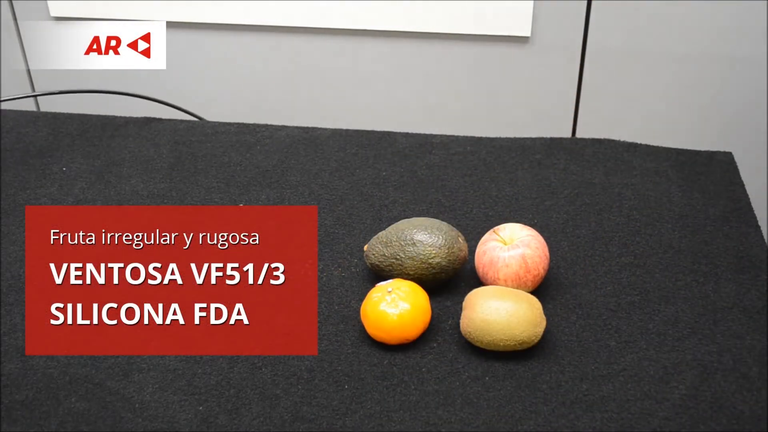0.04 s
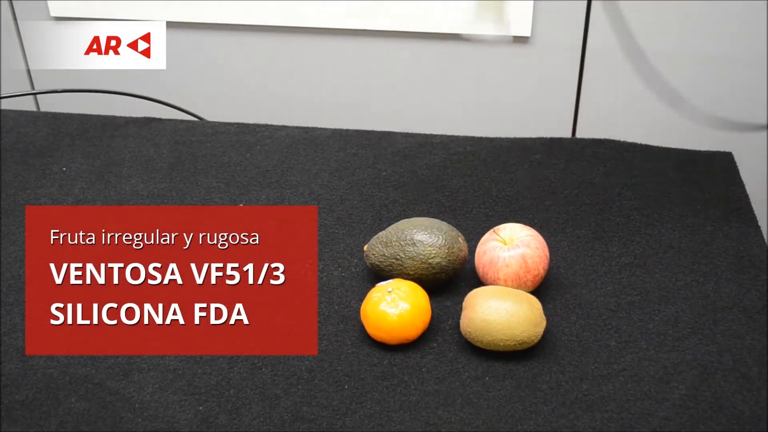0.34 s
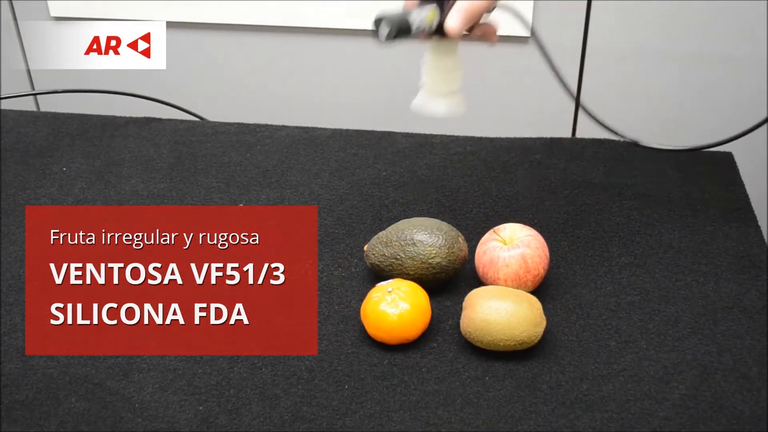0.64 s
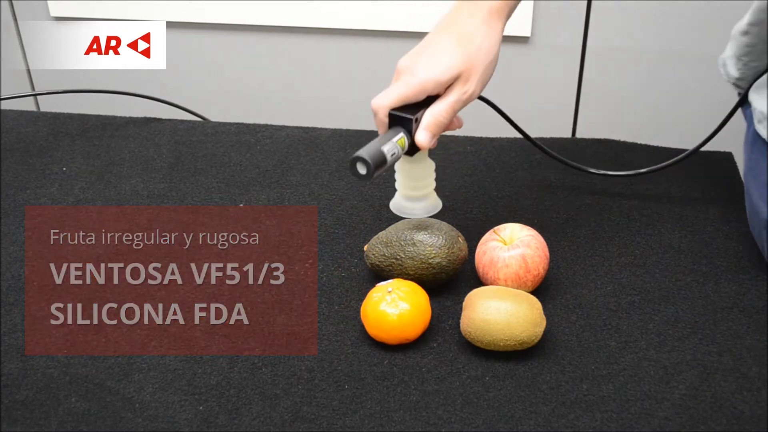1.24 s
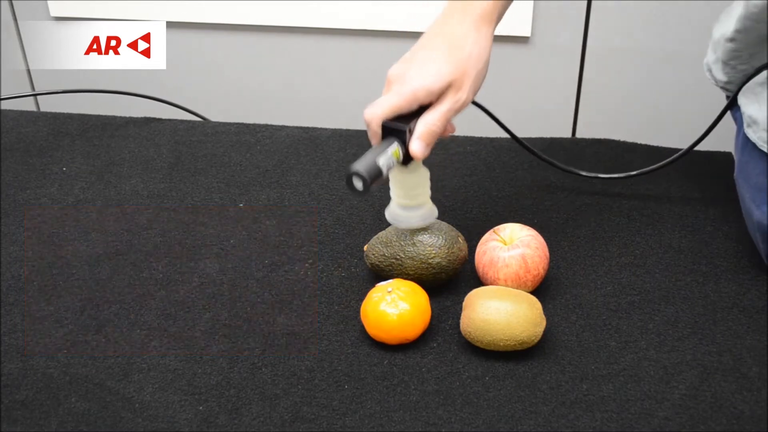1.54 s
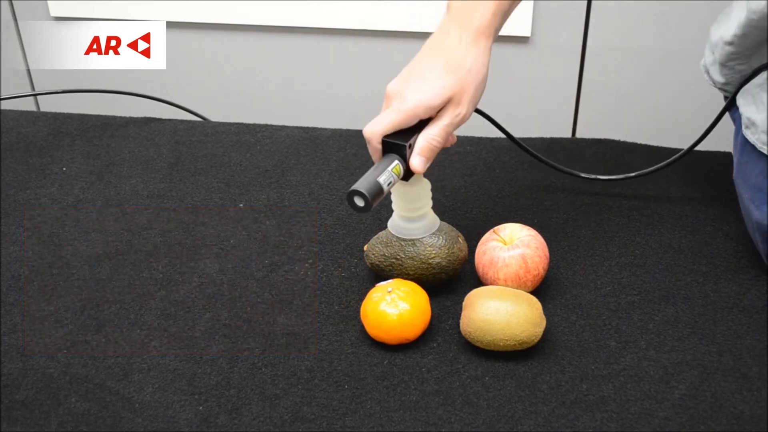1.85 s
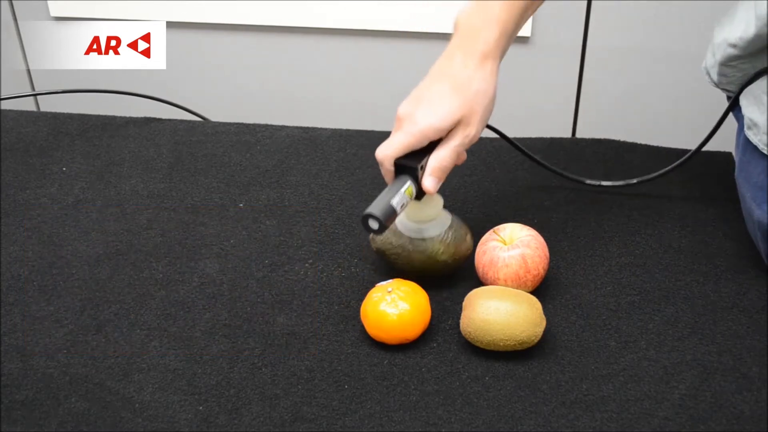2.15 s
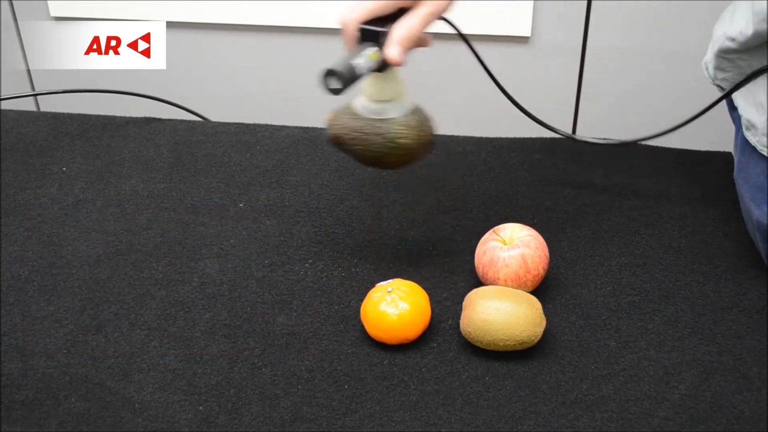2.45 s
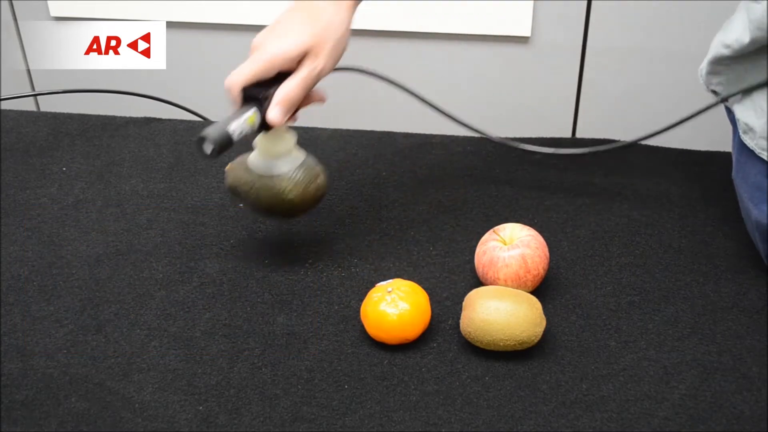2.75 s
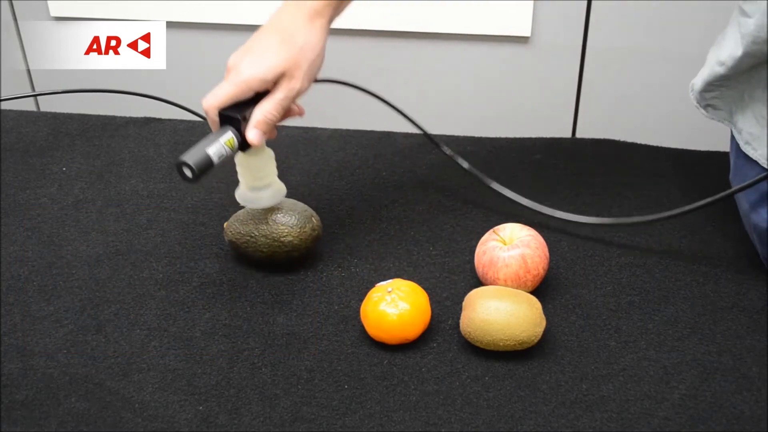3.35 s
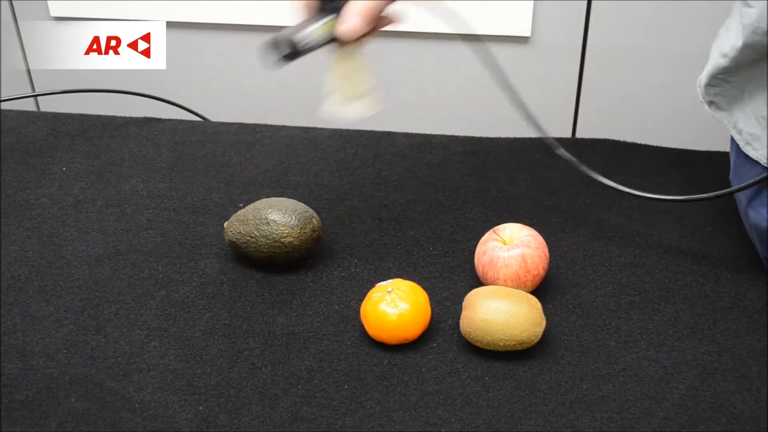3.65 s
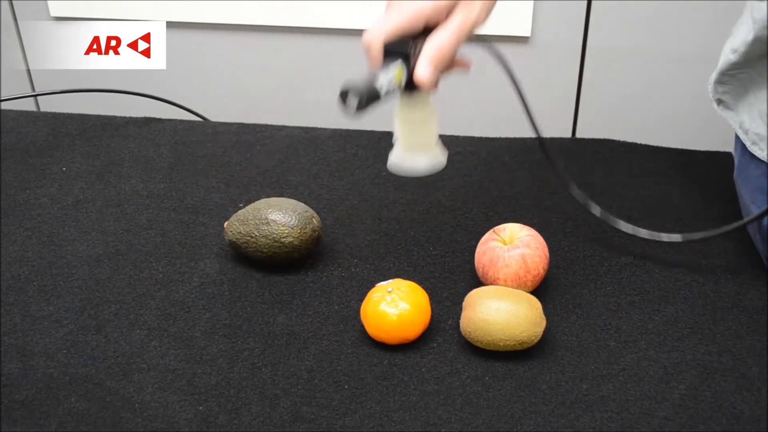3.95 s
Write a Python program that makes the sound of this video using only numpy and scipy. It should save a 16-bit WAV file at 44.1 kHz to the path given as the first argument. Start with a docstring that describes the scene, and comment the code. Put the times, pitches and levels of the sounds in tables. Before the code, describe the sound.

Close up in a small room, a hand-held suction tool gives a sweeping, airy hiss. It sinks as the cup grips a fruit, cuts off with a very faint thud, then spits and comes back loud.

```python
"""A cloth-covered table in a small room, heard close up in mono. A hand-held vacuum ejector hisses with
turbulent exhaust air, faint whistles coming and going as its silicone cup is lowered onto an avocado. The hiss
sinks when the cup seals, and soon after the level dips briefly; the hiss stops as the fruit is set down with a
soft thud, and returns with a spit as the cup lifts away. A reflection off the table top sweeps through the hiss
as the tool moves. Room tone and a low hum lie underneath."""
import sys
import numpy as np
from scipy import signal
from scipy.fft import rfft, irfft
from scipy.io import wavfile
from scipy.ndimage import uniform_filter1d, map_coordinates

SR = 44100
rng = np.random.default_rng(int(sys.argv[2]) if len(sys.argv) > 2 else 0)


def output_pcm(signal):
    """Save a mono or channel-first signal as 16-bit PCM at the path in sys.argv[1].

    Samples are clipped to [-1, 1] before scaling.
    """
    pcm = np.clip(np.atleast_2d(signal).T, -1, 1) * 32767
    wavfile.write(sys.argv[1], SR, np.round(pcm).astype(np.int16))


N = 176400
TIME = np.arange(N) / SR
HZ = np.fft.rfftfreq(N, 1 / SR)

# Colour of the air in each state of the cup. Each row: frequency in Hz, relative level in dB.
DESCENDING_COLOUR = [(60, -41.5), (200, -27.5), (254, -20.5), (286, -29.5), (335, -12), (385, -15),
                     (461, -10), (510, -1), (572, 1.5), (635, -5), (830, 1), (900, -5), (950, 1.5),
                     (1109, -5), (1201, 0.5), (1466, -3.5), (1526, -2), (1938, -4.5), (2017, -2),
                     (2185, -5), (3005, -4.5), (4134, -11.5), (6158, -14), (6940, -15), (8470, -15),
                     (11651, -15.5), (15400, -24.5)]
SEALED_COLOUR = [(60, -30), (200, -25), (400, -19), (490, -6.5), (570, 2.5), (660, -1.5), (820, 0),
                 (1070, -8), (1200, -4.5), (2270, -13), (2750, -12), (4400, -20), (5700, -18.5),
                 (9900, -25.5), (13000, -36), (15400, -36)]
CARRYING_COLOUR = [(60, -48), (200, -30), (310, -32.5), (440, -24.5), (610, -16.5), (700, -11), (790, -3),
                   (930, -8), (1130, 1.5), (1300, -8.5), (1440, -2), (1530, -7), (1640, -5), (1760, -5),
                   (1950, -5.5), (2460, -10.5), (4130, -13.5), (5700, -19), (6400, -20.5), (8800, -18),
                   (10800, -23), (13100, -22.5), (15400, -25)]
RIM_LEAK_COLOUR = [(2000, -32), (6000, -12), (10000, -3), (13000, -6), (15500, -4)]
SHUTTING_COLOUR = [(200, -33), (440, -17), (660, -23), (775, 3.5), (940, -14), (1110, 2), (1400, -12),
                   (2100, -14), (2620, -3), (3000, -18), (4100, -18.5), (6200, -26.5), (15400, -28)]
SPIT_COLOUR = [(200, -33), (800, -10), (1600, -9.5), (2300, -1), (2900, 1.5), (3500, -34), (8000, -13),
               (15000, -28)]
RISING_COLOUR = [(60, -45), (200, -37), (280, -26.5), (380, -23), (450, -25.5), (640, -8), (720, -8),
                 (820, -4), (1050, 0), (1230, 0), (1580, -3.5), (1940, -1.5), (3250, -5), (4400, -4),
                 (6900, -13), (8800, -12), (10800, -15.5), (13100, -12.5), (15400, -14.5)]
# Strength of the air flow in those states. Each row: time in seconds, level in dB.
DESCENDING_FLOW = [(0, -39.5), (.33, -38.5), (.65, -38.5), (1, -39), (1.5, -40), (1.915, -39),
                   (1.955, -47.5), (1.985, -64), (2.03, -74)]
SEALED_FLOW = [(1.922, -46), (1.97, -48), (2.05, -52), (2.176, -51.5)]
CARRYING_FLOW = [(2.182, -51.5), (2.3, -52), (2.45, -51.5), (3.0, -50), (3.13, -52), (3.18, -62.5),
                 (3.22, -75)]
RIM_LEAK_FLOW = [(3.1, -76), (3.16, -57), (3.21, -69), (3.245, -72)]
SHUTTING_FLOW = [(3.14, -57), (3.17, -68), (3.205, -63), (3.227, -47.5), (3.244, -66), (3.27, -75)]
SPIT_FLOW = [(3.502, -83), (3.518, -49.5), (3.53, -49), (3.56, -61), (3.6, -70)]
RISING_FLOW = [(3.511, -79), (3.535, -47), (3.553, -38.5), (3.75, -38), (4, -38)]
# A hollow resonance rises as the tool comes down, a band of hiss as the gap to the fruit closes.
# Each row: time in seconds, pitch in Hz.
HOLLOW_PITCH = [(0, 715), (.3, 796), (.6, 879.6), (1, 968)]
GAP_PITCH = [(.9, 3074), (1.45, 3300), (1.62, 3623), (1.95, 3786)]
# Narrow air resonances of the open cup near the fruit.
# Each row: pitch in Hz, width in Hz, relative level in dB.
AIR_MODES = [(1221, 22, -6), (1438, 25, -2.5), (2810, 26, -17), (3024, 64, -10)]
# Strength of these three kinds of resonance. Each row: time in seconds, level in dB.
HOLLOW_LEVEL = [(0, -50), (.15, -49), (.35, -46.5), (.6, -57), (.85, -68), (1.1, -87)]
GAP_LEVEL = [(.9, -57), (1.45, -60), (1.62, -51), (1.91, -62), (1.98, -72)]
AIR_MODES_LEVEL = [(0, -59), (.7, -62), (1.2, -52), (1.9, -48), (1.98, -77)]
# Treble of the hiss while the tool is far overhead. Each row: time in seconds, gain in dB.
TREBLE_SHADE = [(0, -8), (.15, -7.5), (.4, -1.5)]
# Reflections off hand and table. Each row: time in seconds, lag behind the direct sound in ms.
HAND_LAG = [(0, .38), (.7, .335), (1.4, .345), (2.17, .33), (2.19, .235)]
TABLE_LAG = [(0, 1.44), (.1, 1.35), (.3, 1.24), (.45, 1.185), (.6, 1.086), (.8, .89), (1, .79),
             (1.19, .668), (1.27, .664), (1.34, .7), (1.41, .7), (1.52, .658), (1.66, .568), (1.8, .584),
             (1.91, .562), (2, .49), (2.09, .46), (2.165, .485), (2.19, .32), (2.24, .35), (2.29, .41),
             (2.39, .605), (2.48, .642), (2.62, .595), (2.74, .462), (2.82, .431), (3, .428), (3.06, .39),
             (3.14, .33), (3.24, .35), (3.5, .47), (3.55, .495), (3.6, .572), (3.66, .675), (3.75, .772),
             (3.81, .786), (3.9, .736), (4, .665)]
# Their strength. Each row: time in seconds, level against the direct sound in dB.
HAND_LEVEL = [(0, -35), (.9, -20), (1.4, -22), (1.9, -20), (2.5, -17), (3.2, -16), (3.6, -38)]
TABLE_LEVEL = [(0, -15), (.6, -11.5), (1.2, -7), (1.8, -6.5), (2.3, -9.5), (2.6, -9), (2.85, -5.5),
               (3.15, -10), (3.6, -7), (4, -10)]
# Decay of the room. Each row: frequency in Hz, seconds to fall by 60 dB.
ROOM_T60 = [(200, 0.19), (1000, 0.28), (4000, 0.24), (14000, 0.12)]
# Colour of the room tone. Each row: frequency in Hz, relative level in dB.
ROOM_TONE = [(25, -5.5), (70, -7.5), (130, -8), (260, 0.5), (370, -4), (700, -1.5), (1300, -3), (2300, -9),
             (4000, -22), (7000, -32), (15000, -40)]
# Faint wavering hums. Each row: start and end in seconds, pitch and width in Hz, level in dB.
HUMS = [(0, 2.18, 151.4, 14, -75.5), (2.18, 4, 226.2, 16, -76.5)]
# Air whistles on the way down. Each row: start and end in seconds, pitch and waver in Hz, level in dB.
WHISTLES = [(.22, .88, 834, 11, -49), (.645, .99, 2038, 14, -48.5), (1.62, 1.93, 712, 35, -56),
            (1.68, 1.96, 2039, 14, -57)]


def amp(db):
    """Decibels to gain."""
    return 10 ** (np.asarray(db) / 20)


def unit(x):
    """Scales to rms 1."""
    return x / np.sqrt(np.mean(x ** 2) + 1e-20)


def curve(points):
    """Joins timed points with straight lines."""
    return np.interp(TIME, *np.transpose(points))


def spectrum(points, hz):
    """Joins points on a log-frequency axis."""
    f, value = np.transpose(points)
    return np.interp(np.log(hz + 1), np.log(f), value)


def envelope(points):
    """Gain from a level curve: silent outside it, but held where it runs to an end of the scene."""
    seconds, db = np.transpose(points)
    before = db[0] if seconds[0] < .1 else -150
    after = db[-1] if seconds[-1] > TIME[-1] - .1 else -150
    return amp(np.interp(TIME, seconds, db, left=before, right=after))


def lowpass(corner_hz, order):
    """Gain per frequency, falling to a half at the corner."""
    return 1 / (1 + (HZ / corner_hz) ** order)


def noise(gain):
    """Noise of rms 1 with the given gain per frequency."""
    return unit(irfft(rfft(rng.standard_normal(N)) * gain, N))


def delayed(x, lag_ms):
    """The sound arriving later by a moving lag."""
    return map_coordinates(x, [np.arange(N) - lag_ms * SR / 1000], order=5)


def resonance(hz, width_hz):
    """Noise of rms 1 ringing in one resonance, steady or gliding."""
    band = signal.hilbert(noise(1 / (1 + ((HZ - SR / 4) / width_hz * 2) ** 2)))
    turns = np.cumsum(hz * np.ones(N)) / SR - np.arange(N) / 4  # shifts the band from SR / 4 to hz
    return unit((band * np.exp(2j * np.pi * turns)).real)


def ejector(flutter_db=.45, flutter_hz=44.2):
    """Exhaust air, coloured by the state of the cup and fluttering with the turbulence of the jet."""
    states = [(DESCENDING_COLOUR, DESCENDING_FLOW), (SEALED_COLOUR, SEALED_FLOW),
              (CARRYING_COLOUR, CARRYING_FLOW), (RIM_LEAK_COLOUR, RIM_LEAK_FLOW),
              (SHUTTING_COLOUR, SHUTTING_FLOW), (SPIT_COLOUR, SPIT_FLOW), (RISING_COLOUR, RISING_FLOW)]
    air = sum(noise(amp(spectrum(colour, HZ))) * envelope(flow) for colour, flow in states)
    air += resonance(curve(HOLLOW_PITCH), width_hz=210) * envelope(HOLLOW_LEVEL)
    air += resonance(curve(GAP_PITCH), width_hz=320) * envelope(GAP_LEVEL)
    modes = sum(resonance(hz, width) * amp(db) for hz, width, db in AIR_MODES)
    air += modes * envelope(AIR_MODES_LEVEL)
    return air * amp(flutter_db * noise(lowpass(flutter_hz, 2)))


def overhead_shade(x, corner_hz=11000):
    """The hiss reaches the microphone duller while the tool is far overhead."""
    treble = irfft(rfft(x) * (1 - lowpass(corner_hz, 8)), N)
    return x + treble * (amp(curve(TREBLE_SHADE)) - 1)


def table_lag_ms():
    """The smoothed lag of the table's reflection, which stands for the tool's height."""
    return uniform_filter1d(curve(TABLE_LAG), size=1700)


def hand_reflection(x):
    """The jet plus its very short reflection off the hand: a sliding comb."""
    strength = amp(curve(HAND_LEVEL))
    return (x + strength * delayed(x, curve(HAND_LAG))) / np.sqrt(1 + strength ** 2)


def table_reflection(x, dull_hz=18000, trailing_ms=.15, trailing_db=-17):
    """The jet plus two close bounces off the table, weaker when held high: a sweeping comb."""
    lag_ms, strength = table_lag_ms(), amp(curve(TABLE_LEVEL))
    dull = irfft(rfft(x) * np.sqrt(lowpass(dull_hz, 4)), N)
    echo = delayed(dull, lag_ms) + amp(trailing_db) * delayed(dull, lag_ms + trailing_ms)
    return (x + strength * echo) / np.sqrt(1 + strength ** 2)


def clutter(x, count=6, above_hz=2000, level_db=-22):
    """Fruit, arm and hose scatter the treble, each lag drifting its own way with the tool's height."""
    treble = irfft(rfft(x) * (1 - lowpass(above_hz, 2)), N)
    lags_ms = rng.uniform(.7, 2.4, count)
    drifts = rng.uniform(-.45, .5, count)
    echoes = sum(delayed(treble, lag + drift * table_lag_ms()) for lag, drift in zip(lags_ms, drifts))
    return amp(level_db) * echoes


def room(x, step_ms=.22, level_db=-5.5):
    """Short diffuse tails whose treble dies first; each height of the tool excites a different one."""
    lag_ms, wet = table_lag_ms(), np.zeros(N)
    for centre_ms in np.arange(lag_ms.min(), lag_ms.max() + step_ms, step_ms):
        share = np.cos(np.pi / 2 * np.clip((lag_ms - centre_ms) / step_ms, -1, 1))
        hz, age, bands = signal.stft(rng.standard_normal(SR // 2), SR, nperseg=256)
        decay = amp(-60 * age / spectrum(ROOM_T60, hz)[:, None])
        tail = signal.istft(bands * decay, SR, nperseg=256)[1]
        tail[:100] = 0  # the direct sound reaches the microphone first
        wet += signal.fftconvolve(x * share, tail / np.linalg.norm(tail))[:N]
    return amp(level_db) * wet


def background(tone_db=-70):
    """Room tone and a low hum behind the tool."""
    hum = sum(resonance(hz, width) * amp(db) * ((TIME >= start) & (TIME < end))
              for start, end, hz, width, db in HUMS)
    return hum + amp(tone_db) * noise(amp(spectrum(ROOM_TONE, HZ)))


def whistle(start, end, hz, waver_hz, db, fade_s=.05, flicker_db=3.5):
    """An unsteady tone in the air stream that fades in and out."""
    fade = np.clip(np.minimum(TIME - start, end - TIME) / fade_s, 0, 1)
    slow = lowpass(corner_hz=30, order=2)
    pitch = hz + waver_hz * noise(slow)
    tone = np.sin(2 * np.pi * np.cumsum(pitch) / SR)
    return unit(tone * amp(flicker_db * noise(slow))) * amp(db) * fade


def fruit_thud(start_s=3.232, attack_s=.004, t60_s=.13, level_db=-71):
    """The fruit lands on the cloth with a soft, dull bump."""
    age = np.maximum(TIME - start_s, 0)
    attack = np.minimum(age / attack_s, 1)
    return noise(lowpass(corner_hz=200, order=4)) * attack * amp(level_db - 60 * age / t60_s)


def scene():
    """Tool, table and room at one microphone, the same in both channels."""
    air = overhead_shade(ejector())
    whistles = sum(whistle(*row) for row in WHISTLES)
    close_hiss = table_reflection(hand_reflection(air)) + clutter(air)
    mono = close_hiss + room(air) + whistles + fruit_thud() + background()
    return np.array([mono, mono])


def record(dry, dip_start_s=2.165, dip_end_s=2.1975, dip_db=-34, edge_hz=15850):
    """The level dips briefly after the cup seals, and the highest treble is cut off."""
    dip = (TIME > dip_start_s) & (TIME < dip_end_s)
    band_limit = signal.firwin(511, edge_hz, window=("kaiser", 9), fs=SR)
    return signal.oaconvolve(dry * amp(dip_db * dip), band_limit[None], "same")


dry = scene()
out = record(dry)
output_pcm(out)
```